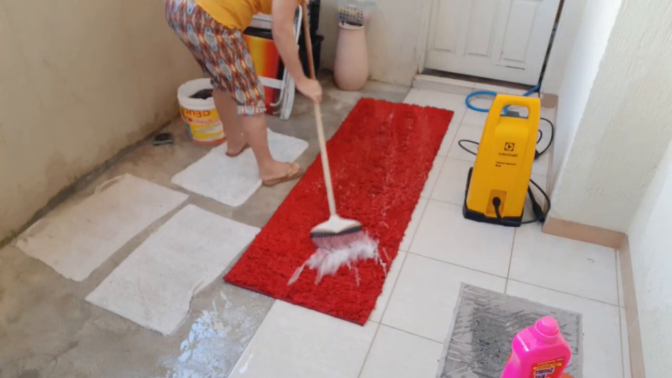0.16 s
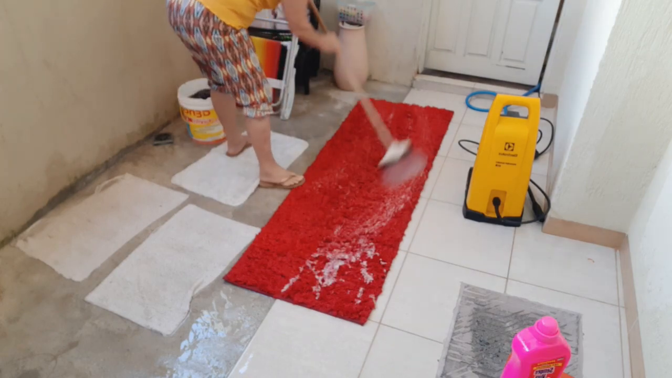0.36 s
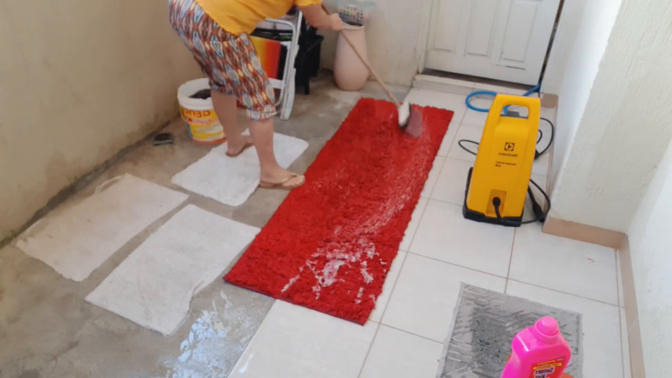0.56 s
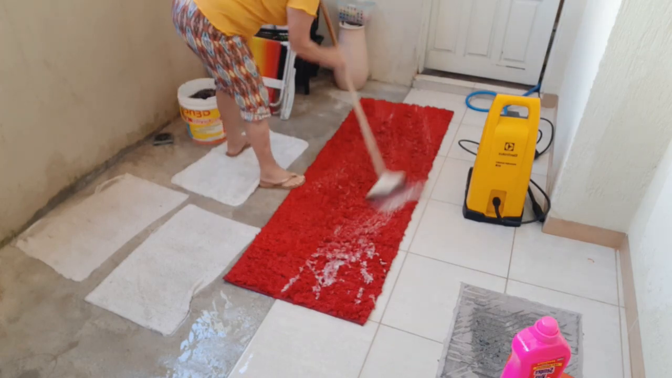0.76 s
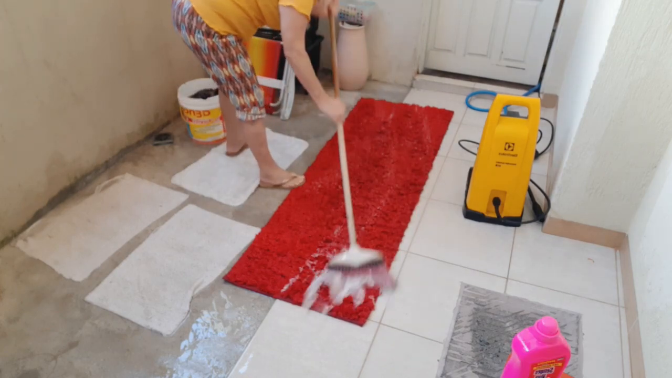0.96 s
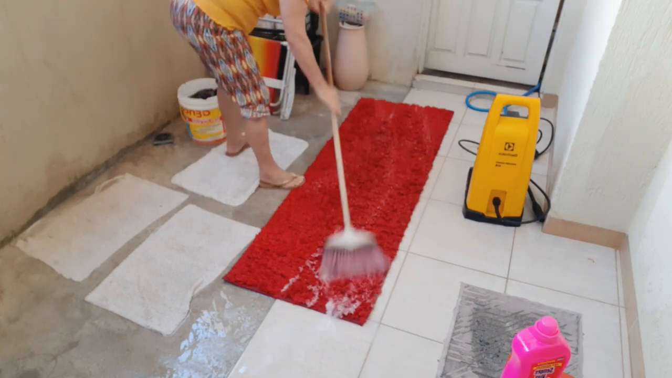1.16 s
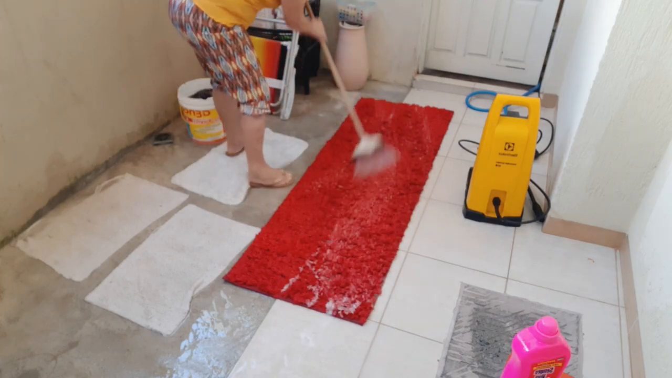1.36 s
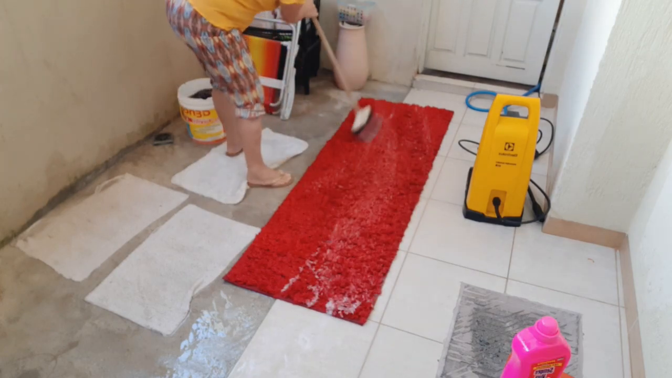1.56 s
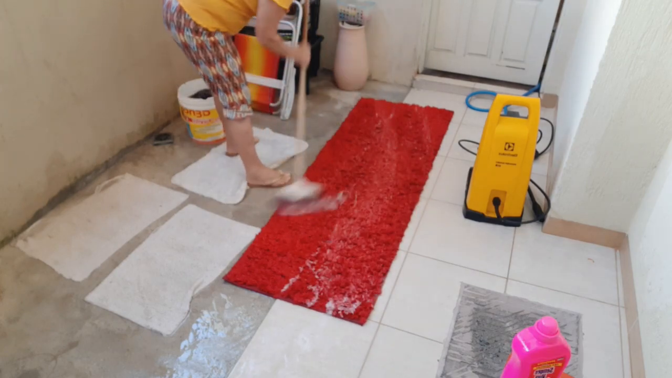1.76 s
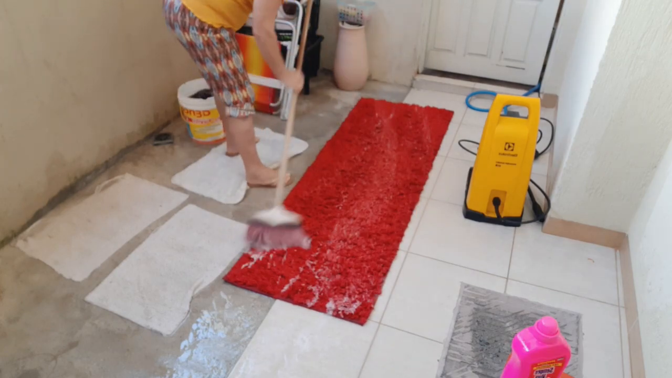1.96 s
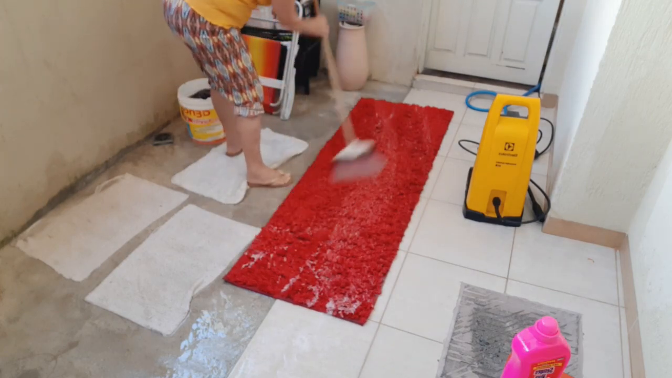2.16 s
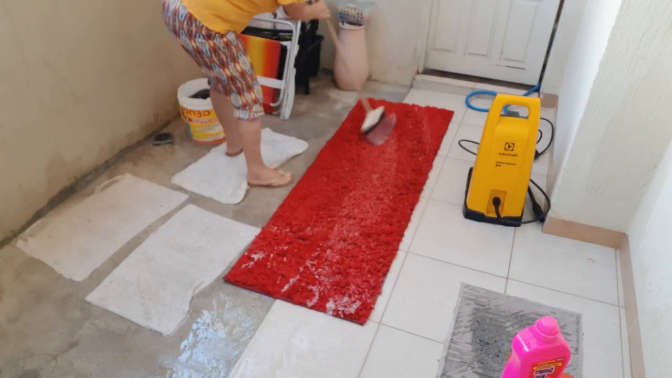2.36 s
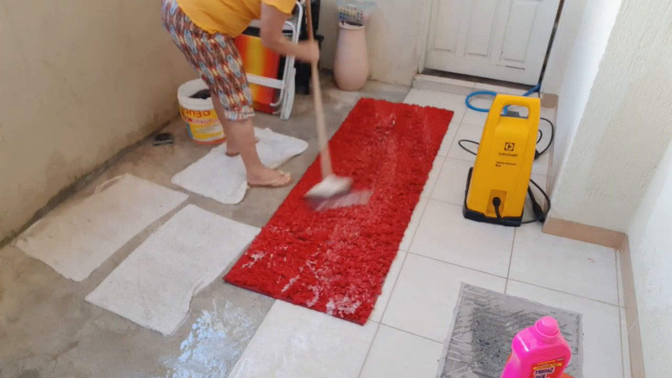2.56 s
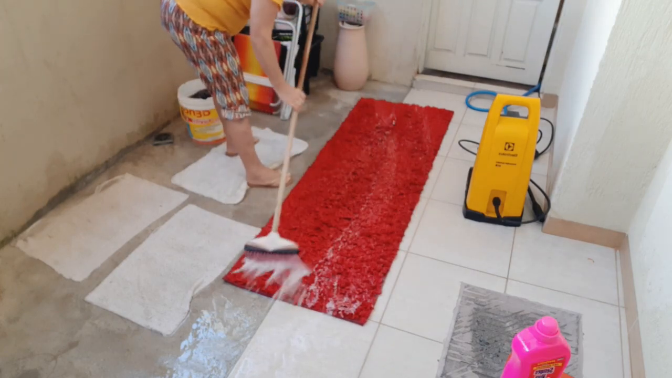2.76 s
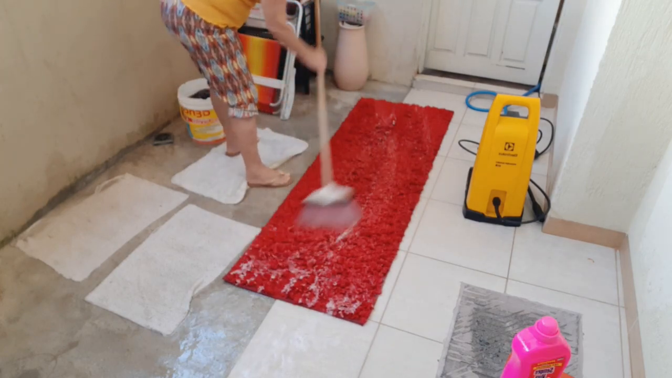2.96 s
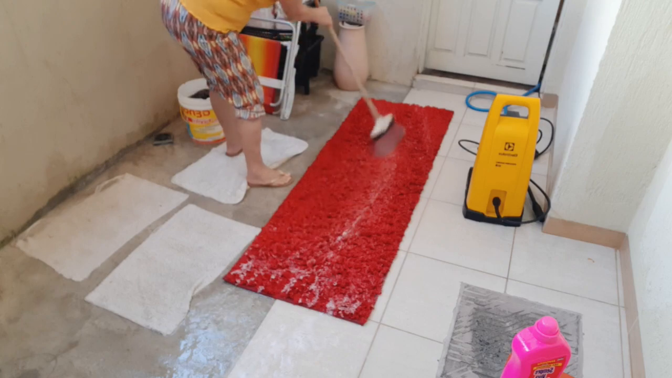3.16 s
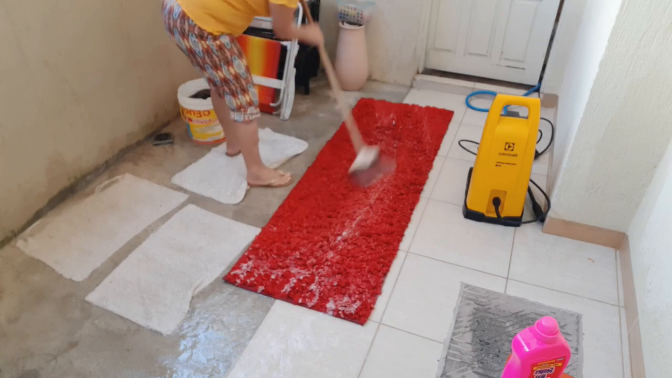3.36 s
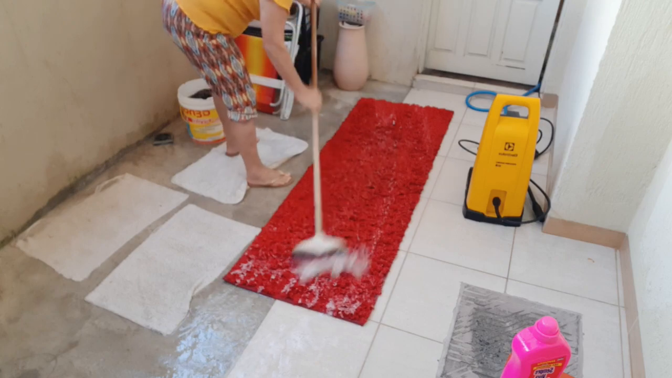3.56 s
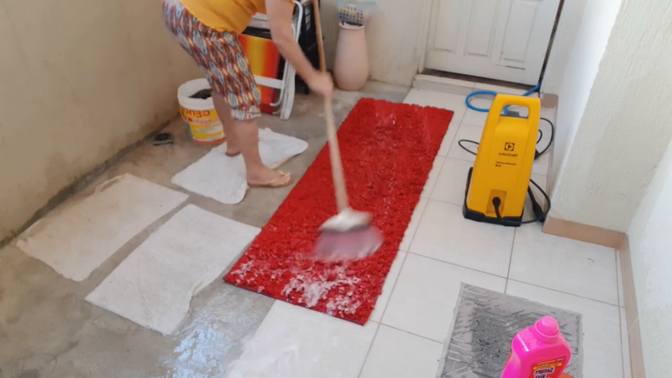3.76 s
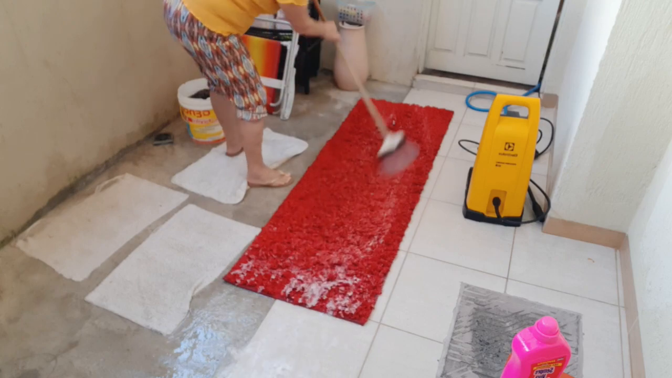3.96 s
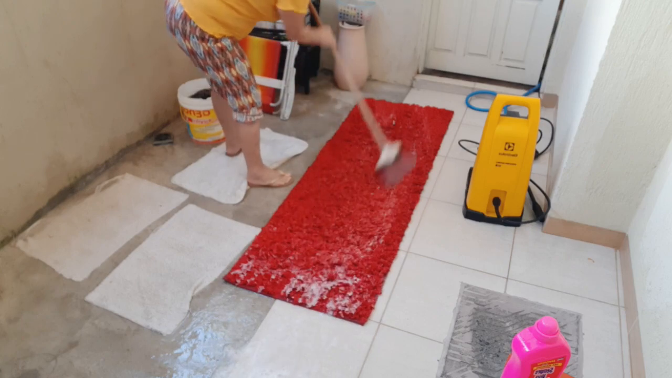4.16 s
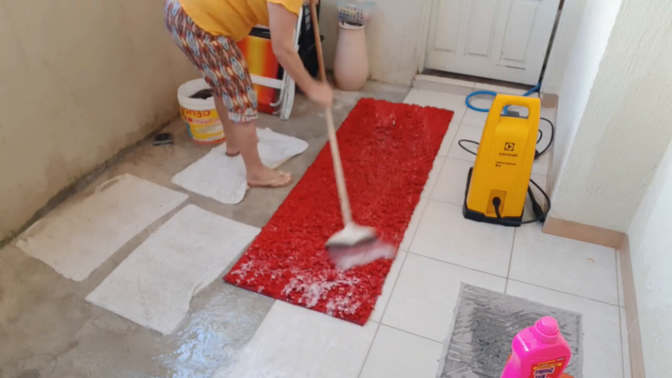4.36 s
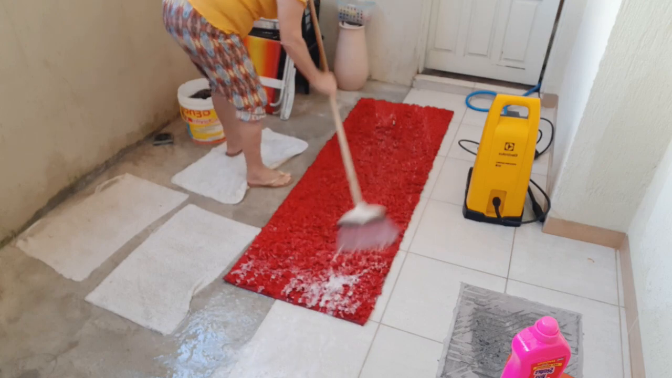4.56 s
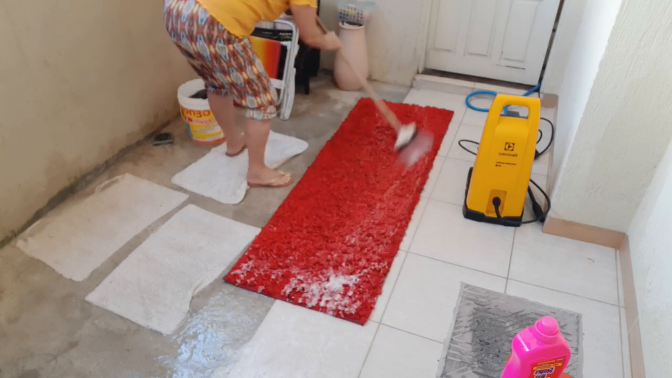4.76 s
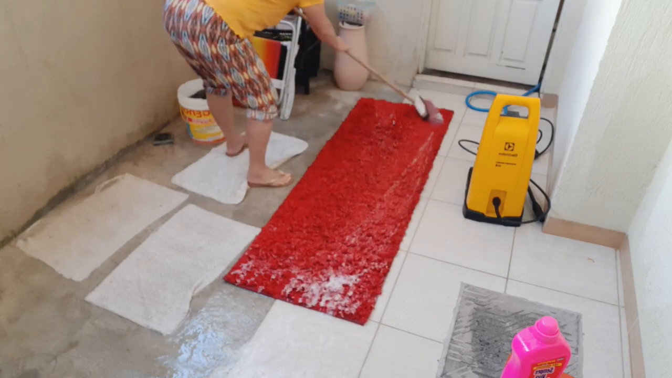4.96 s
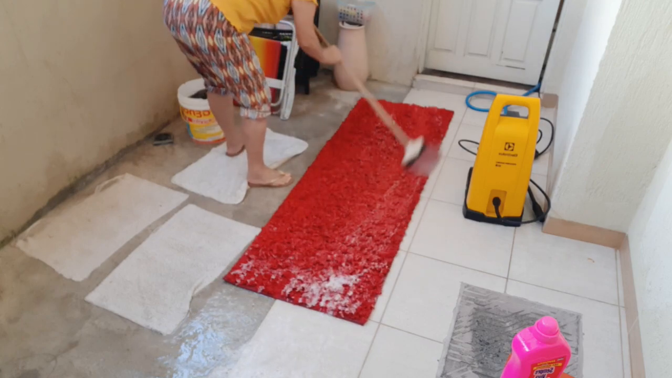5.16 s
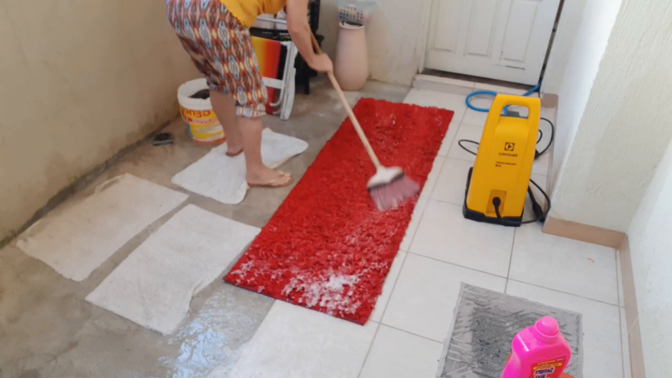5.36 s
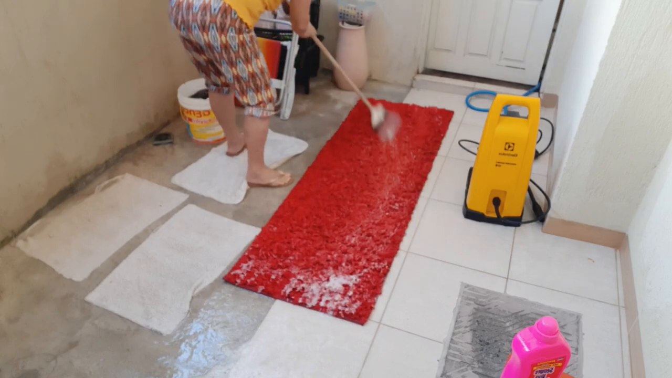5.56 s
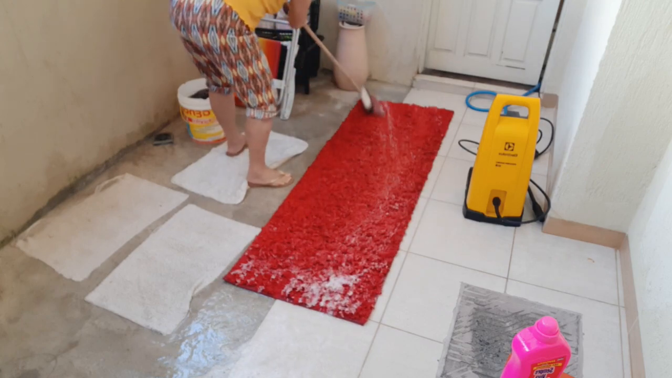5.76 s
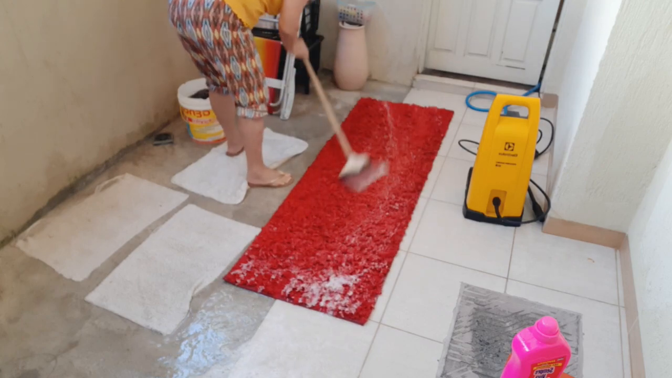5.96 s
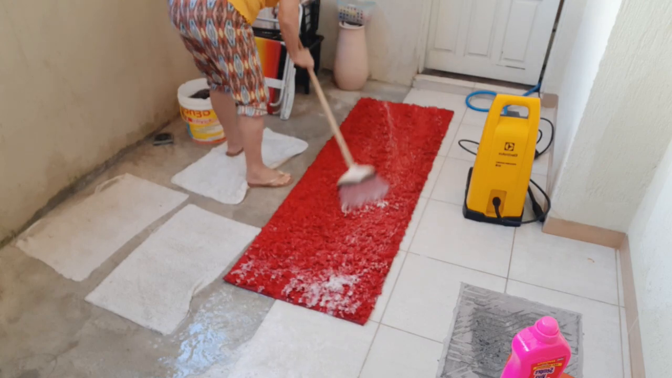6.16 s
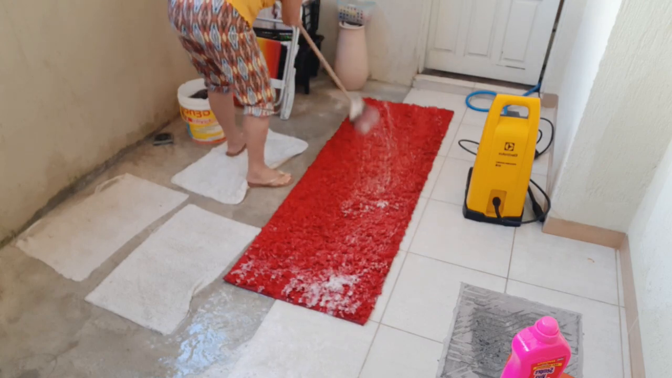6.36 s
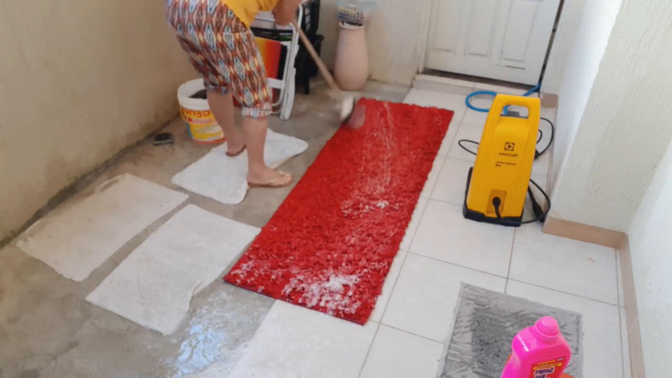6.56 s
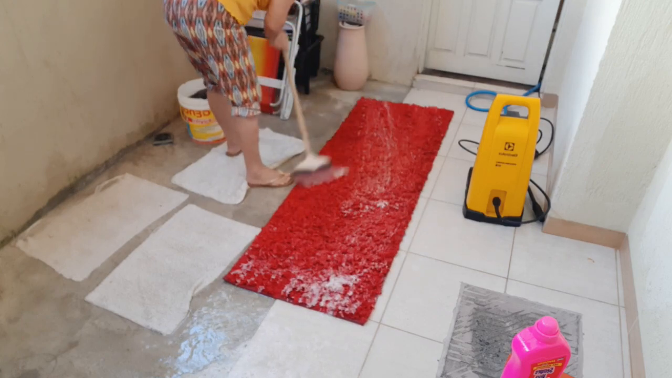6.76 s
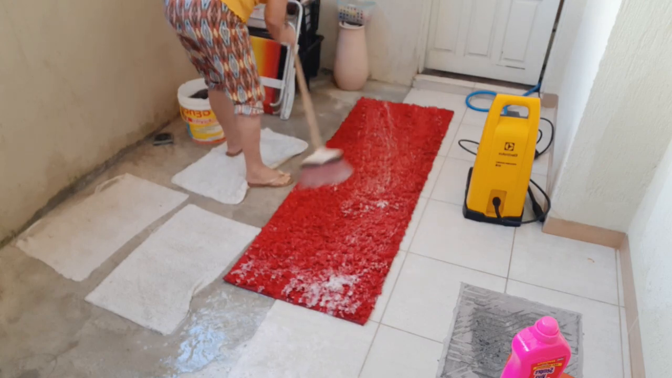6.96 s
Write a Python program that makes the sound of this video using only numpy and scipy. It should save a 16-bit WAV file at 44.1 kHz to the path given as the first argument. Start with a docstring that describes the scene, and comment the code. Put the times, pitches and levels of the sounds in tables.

```python
"""A push is already under way: a long-handled brush scrubs a wet, soapy rug to and fro in a small tiled room.
Thousands of random clicks are bristles snapping through the pile, ringing the plastic head and whipping up foam.
Hard pushes make the head judder, as short unsteady tones.
The hard walls blur the snaps into a dense hiss, noise that follows their energy and lingers briefly at each turn.
A faint steady hush lies behind, and a pair of microphone ports takes it all in."""
import sys
import numpy as np
from scipy import signal
from scipy.fft import rfft, irfft
from scipy.io import wavfile
from scipy.ndimage import uniform_filter1d

SR = 44100
rng = np.random.default_rng(int(sys.argv[2]) if len(sys.argv) > 2 else 0)


def wrap_up_sound(samples):
    """Save the sound to the file named by the first command line argument, as 16-bit audio."""
    columns = np.atleast_2d(samples).T
    # keep every value between -1 and 1, then stretch to whole-number steps
    tamed = np.clip(columns, -1, 1)
    steps = np.round(tamed * 32767).astype(np.int16)
    wavfile.write(sys.argv[1], SR, steps)


N = 308700  # samples: 7 s
HZ = np.fft.rfftfreq(N, 1 / SR)
TIME = np.arange(N) / SR  # s


def brush():
    """Bristles drag through the pile; the faster they go, the more of them snap each second."""
    # colours of the four parts of a stroke: f/Hz, level/dB per Hz
    pile_colour = [(250, -29.5), (450, -14), (700, -1.5), (1000, -0.4), (1500, -0.5), (2100, -1.5),
                   (2800, -7), (4000, -15.5), (8000, -45), (16000, -53)]
    tips_colour = [(800, -28.5), (1600, -7.5), (2500, -1), (4300, 0.5), (5500, -2), (7000, -5.5),
                   (10000, -14.5), (16000, -21)]
    foam_colour = [(2500, -28), (5000, -1.5), (7500, -1), (11500, -1), (13500, -0.5), (16000, -1)]
    weight_colour = [(20, -44), (40, -39), (53, -8.5), (70, -5.5), (108, -9), (145, -6), (200, -5.5),
                     (255, -10), (300, -4), (360, -0.5), (520, 1.5), (750, -3.5), (1200, -27), (4000, -50)]
    # resonances of brush head and handle: f/Hz, width/Hz, level/dB re the plain rub
    head_modes = [(441, 11, -3), (631, 39, -17.5), (696, 15, -15), (800, 30, -10), (1522, 62, -1),
                  (2040, 25, -1)]

    sweep, bite, spray, weight = scrubbing()
    speed = evened(sweep) ** 0.24
    pile_snaps = snaps(4000 * speed, spread_db=2.5, clump_db=0.7, clump_per_s=55)
    pile = scrape(sweep, pile_snaps, pile_colour)
    tip_snaps = snaps(4500 * speed, spread_db=3.5, clump_db=0.4, clump_per_s=73)
    tips = scrape(bite, tip_snaps, tips_colour)
    foam_snaps = snaps(5500 * speed, spread_db=3.0, clump_db=0.5, clump_per_s=79)
    foam = scrape(spray, foam_snaps, foam_colour)
    thrum_snaps = snaps(2200 * speed, spread_db=1.5, clump_db=1.5, clump_per_s=52)
    thrum = scrape(weight, thrum_snaps, weight_colour)
    # the foam does not ring the head
    return ringing(pile + tips + thrum, head_modes) + foam


def scrubbing():
    """Levels of sweep, bite, spray and weight: pushes and pulls in turn, with digs and spurts on top."""
    # The brush is pushed out along the rug, then drawn back more lightly, one row a stroke:
    # start t/s, length/s, sweep through the wet pile/dB, bite of the bristle tips/dB,
    # spray of foam/dB, weight on the head/dB, growth of pressure from start to end/dB
    pushes = [(-0.141, 0.4, -31.5, -29.5, -32.5, -44.0, -8), (0.599, 0.55, -31.0, -28.0, -29.0, -42.5, -2),
              (1.552, 0.43, -32, -29.5, -28.5, -41.5, 3.5), (2.378, 0.45, -30.5, -29.5, -30, -40, 5.5),
              (3.324, 0.388, -30.5, -29.0, -31, -40, 6), (4.158, 0.332, -31.0, -28.5, -29, -43.5, 8.5),
              (5.043, 0.32, -33.5, -30.5, -29.5, -48, 11), (5.759, 0.39, -31.5, -29.5, -29, -43.5, 10.5),
              (6.556, 0.38, -33.0, -29.5, -30, -46.0, 1.5)]
    pulls = [(0.229, 0.33, -31.5, -30.5, -31.0, -48.5, -7), (1.127, 0.4, -31.5, -35, -36.5, -45.5, 9.5),
             (1.996, 0.35, -32.0, -34.5, -32, -45.5, -0.5), (2.92, 0.37, -32.5, -34.5, -33.0, -47.5, -3.5),
             (3.727, 0.38, -33.0, -34.5, -36.0, -49, 5.5), (4.564, 0.47, -32.5, -30.5, -31.5, -45, -7),
             (5.423, 0.38, -33.0, -31, -33, -46.5, -7), (6.175, 0.35, -33, -33.5, -35.5, -45.5, 2.5)]
    # Swell of sweep, bite, spray and weight, one row each:
    # place of the top [share of the stroke], steepness of the flanks [exponent]
    push_shape = [(0.28, 0.84), (0.25, 0.83), (.14, 1.04), (0.47, 1)]  # the tips dig in and throw foam early
    pull_shape = [(0.48, 0.99), (0.73, 1), (.8, 1.3), (.54, 1.1)]  # the trailing tips catch late
    # what remains while the brush turns round: sweep, bite, spray, weight, each level/dB
    turn_db = [-46, -40.5, -39.5, -56.5]
    # bristles dig deeper in the middle of a hard push: t/s, length/s, level/dB
    dig_events = [(.85, 0.09, -29.5), (1.775, .05, -28), (4.36, 0.046, -30.5)]
    # foam squeezed out from under the brush: t/s, length/s, level/dB
    spurts = [(1.995, .05, -34), (2.68, 0.06, -34), (5.698, 0.037, -22), (5.77, .07, -31),
              (6.495, 0.037, -35)]
    dig_weight_db = -16.5  # how much of a dig bears on the head

    strokes = swells(pushes, push_shape) + swells(pulls, pull_shape)
    sweep, bite, spray, weight = strokes + gain_of(turn_db)[:, None] ** 2
    digs = surges(dig_events)
    bite = bite + digs
    spray = spray + surges(spurts)
    weight = weight + gain_of(dig_weight_db) ** 2 * digs
    return np.sqrt([sweep, bite, spray, weight])


def swells(strokes, shape):
    """Power of each part of a stroke rises and falls in one arch as the brush speeds up and stops."""
    top, steepness = np.transpose(shape)[:, :, None]
    top = np.clip(top, .05, .95)
    power = np.zeros((len(shape), N))
    for start, length, *parts_db, growth_db in strokes:
        during = (TIME > start) & (TIME < start + length)
        gone = (TIME[during] - start) / length  # share of the stroke
        flanks = np.minimum(gone / top, (1 - gone) / (1 - top))
        arch = np.sin(np.pi / 2 * flanks) ** steepness
        level_db = np.array(parts_db)[:, None] + growth_db * (gone - .5)
        power[:, during] += (arch * gain_of(level_db)) ** 2
    return power


def surges(events):
    """The power of short, bell-shaped surges."""
    return sum(gain_of(db) ** 2 * np.exp(-(2 * (TIME - s) / length) ** 2) for s, length, db in events)


def snaps(per_s, spread_db, clump_db, clump_per_s):
    """Random tiny clicks, a few of them large, swelling together as whole tufts let go."""
    sign = rng.choice([-1., 1.], N)
    size = sign * gain_of(spread_db * np.minimum(rng.exponential(1, N), 5))
    happens = rng.random(N) < per_s / SR
    return size * happens * gain_of(clump_db * wander(clump_per_s))


def scrape(level, clicks, colour):
    """A stream of snaps at the given level, spread by the room and given its colour."""
    heard = room(level * evened(clicks), direct_db=-9, early_db=-2.0)
    colour_rms = np.sqrt(np.mean(gain_of(read(colour, HZ)) ** 2))
    return coloured(heard, colour) / colour_rms


def judder(waver):
    """The tufts stick and slip together for a moment: a short, unsteady groan."""
    # the head judders under a hard push: middle t/s, length/s, f/Hz, level/dB
    judders = [(1.785, 0.078, 423, -43), (1.816, 0.3, 54.4, -53), (2.576, .13, 54, -55),
               (2.6, 0.054, 625, -41), (2.646, 0.047, 444, -33), (2.728, 0.045, 426, -40),
               (3.63, 0.062, 440, -37.5), (6.057, .04, 440, -39)]
    out = np.zeros(N)
    for s, length, hz, db in judders:
        unrest_per_s = 2 * np.sqrt(hz)  # deep shudders change more slowly
        turns = np.cumsum(hz * (1 + waver * wander(unrest_per_s))) / SR
        swell = np.exp(-2 * ((TIME - s) / length) ** 2)
        level = gain_of(db + 2 * wander(unrest_per_s))
        out += level * swell * np.sin(2 * np.pi * turns)
    return out


def hollow(x, patchy_db, top_hz):
    """As the brush moves, echoes add and cancel at shifting pitches in the low and middle range."""
    hz, _, z = signal.stft(x, SR, nperseg=2048)
    # chance gains, smoothed along time and the same at both ports
    patches = evened(uniform_filter1d(rng.standard_normal(z.shape[1:]), size=7, axis=1))
    depth_db = patchy_db / (1 + (hz[:, None] / top_hz) ** 2)
    return signal.istft(z * gain_of(depth_db * patches), SR, nperseg=2048)[1][:, :N]


def room(x, direct_db, early_db):
    """Every bristle snaps at its own spot, so echoes blur into a wash that follows the snaps' energy."""
    early_t60, late_t60 = 0.034, 0.31  # s: first bounces off floor and near walls, late wash
    direct, early = gain_of(direct_db), gain_of(early_db)
    energy = early ** 2 * lingering(x ** 2, early_t60) + lingering(x ** 2, late_t60)
    straight = direct * np.array([x, np.roll(x, 4)])  # 4 samples later at the right port
    wash = np.sqrt(energy) * diffuse()
    return (straight + wash) / np.sqrt(1 + direct ** 2 + early ** 2)


def lingering(power, t60):
    """Sound energy that dies away by 60 dB in t60 seconds."""
    keep = np.exp(-np.log(10 ** 6) / (t60 * SR))
    return signal.lfilter([1 - keep], [1, -keep], power)


def diffuse():
    """Noise that arrives from all sides: long waves reach both ports alike, short ones do not."""
    # likeness of the two ports: f/Hz, left-right correlation [-1 to 1]
    likeness = [(60, 0.96), (160, 0.9), (270, 0.86), (450, 0.72), (740, 0.02), (1200, 0), (15000, 0.033)]
    left, other = rfft(rng.standard_normal((2, N)))
    alike = np.clip(read(likeness, HZ), -1, 1)
    right = alike * left + np.sqrt(1 - alike ** 2) * other
    return irfft(np.array([left, right]), N)


def steady_hush():
    """A faint, steady background: diffuse noise, strongest in the low range."""
    # colour of the hush: f/Hz, level/dB per Hz
    hush_colour = [(20, -30), (40, -24), (60, -4.5), (150, 0), (300, 1.5), (600, -19), (2000, 0),
                   (8000, -4), (16000, -13.5)]
    return gain_of(-45.5) * evened(coloured(diffuse(), hush_colour))


def ringing(x, modes):
    """A sound plus the resonances that it excites."""
    ring = sum(gain_of(db) / (1 + 2j * (HZ - hz) / width) for hz, width, db in modes)
    return irfft(rfft(x) * (1 + ring), N)


def wander(per_s):
    """Smooth chance of rms one that changes up to about per_s times a second."""
    return evened(irfft(rfft(rng.standard_normal(N)) / (1 + (HZ / per_s) ** 4), N))


def coloured(x, points):
    """Filters by a table of f/Hz, level/dB."""
    return irfft(rfft(x) * gain_of(read(points, HZ)), N)


def read(points, hz):
    """Reads a table on a logarithmic frequency axis."""
    f, value = np.transpose(points)
    return np.interp(np.log(hz + 1), np.log(f + 1), value)


def evened(x):
    """Scales to an rms of one."""
    return x / np.sqrt(np.mean(x ** 2) + 1e-20)


def gain_of(db):
    """Decibels to an amplitude factor."""
    return 10 ** (np.asarray(db) / 20)


def scene():
    """The brush and the hush excite the standing waves of the small room; the judders come on top."""
    # standing waves of the room: f/Hz, width/Hz, level/dB re the plain sound
    room_modes = [(58, 12, -4.5), (135, 24, -7.5), (293, 22, -2.5), (316, 17, -11)]
    scrub = hollow(brush(), patchy_db=3.0, top_hz=3500)
    return ringing(scrub + steady_hush(), room_modes) + judder(waver=0.0242)


def record(dry):
    """The microphone ports colour the treble and favour the right; then the band limit."""
    # colour of the microphone ports: f/Hz, level/dB
    port_colour = [(20, -0.5), (7000, -0.5), (7950, 1), (8500, -6), (9000, -5), (10000, -3), (11300, 1),
                   (16000, -0.5)]
    # balance of the two ports: f/Hz, left minus right level/dB
    balance = [(60, -3), (160, -3.5), (450, -1.5), (740, -1), (1250, -3), (3300, -2), (9000, -1),
               (15000, -1.6)]
    lean = gain_of(np.array([[.5], [-.5]]) * read(balance, HZ))
    heard = irfft(rfft(coloured(dry, port_colour)) * lean, N)
    low_pass = signal.firwin(1023, 15750, window=("kaiser", 9), fs=SR)  # edge in Hz
    return signal.oaconvolve(heard, low_pass[None], "same")


dry = scene()
out = record(dry)
wrap_up_sound(out)
```